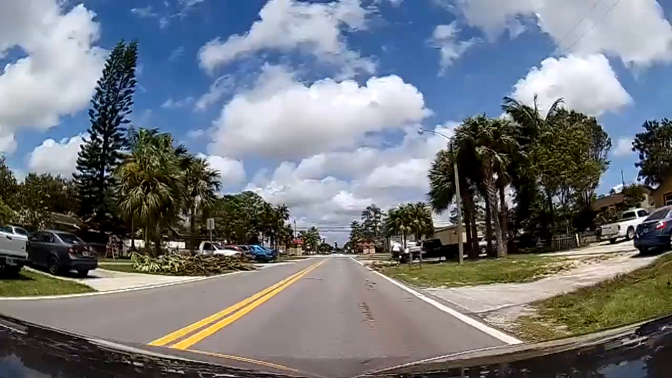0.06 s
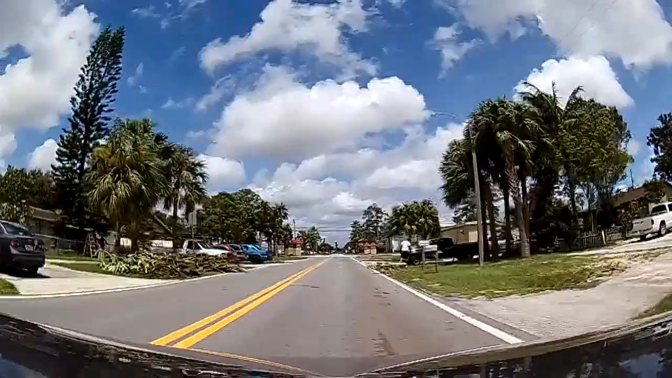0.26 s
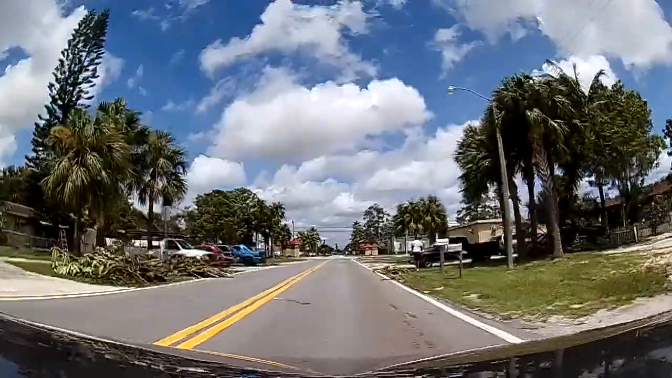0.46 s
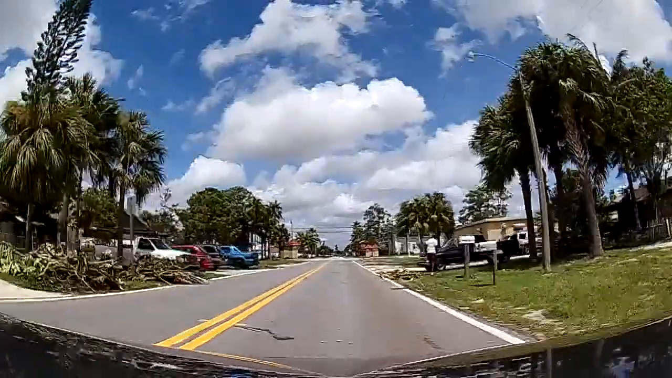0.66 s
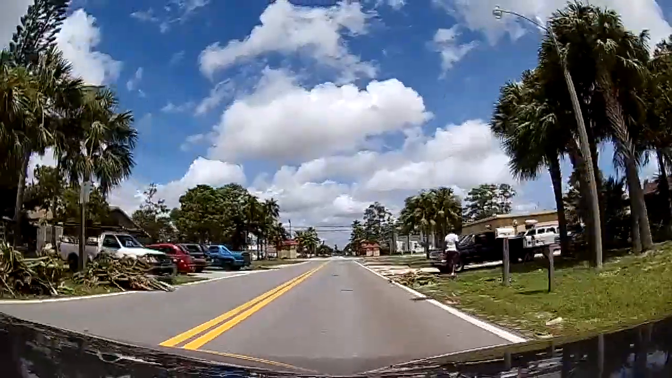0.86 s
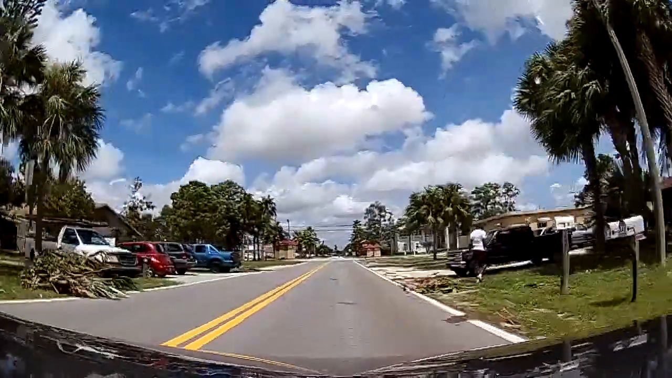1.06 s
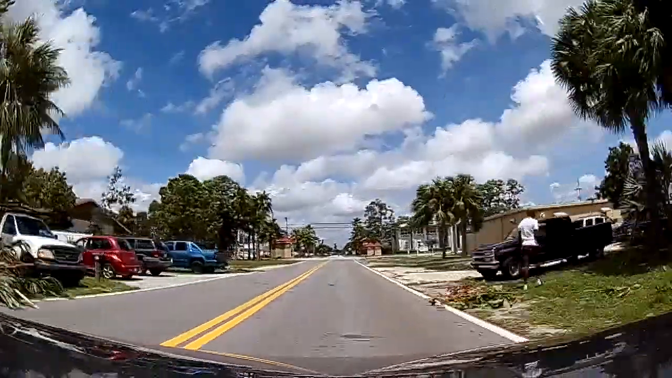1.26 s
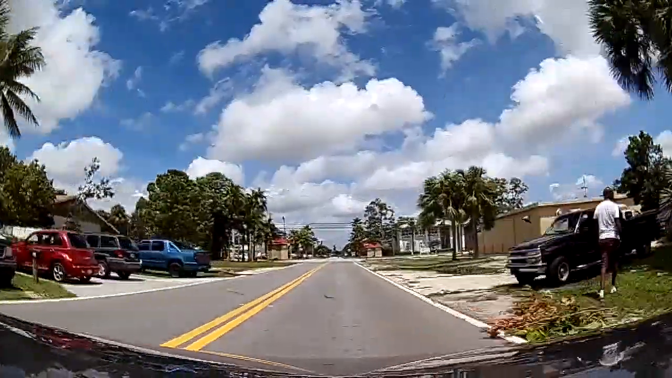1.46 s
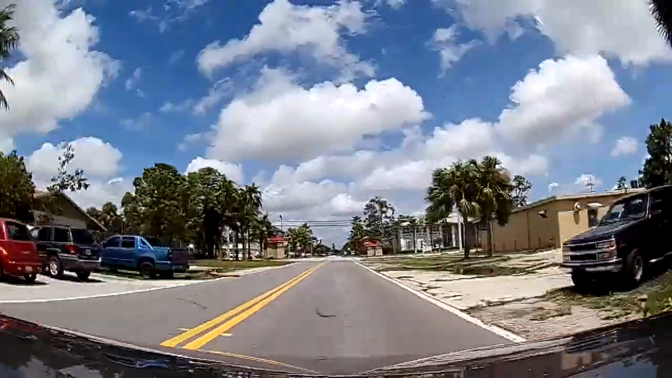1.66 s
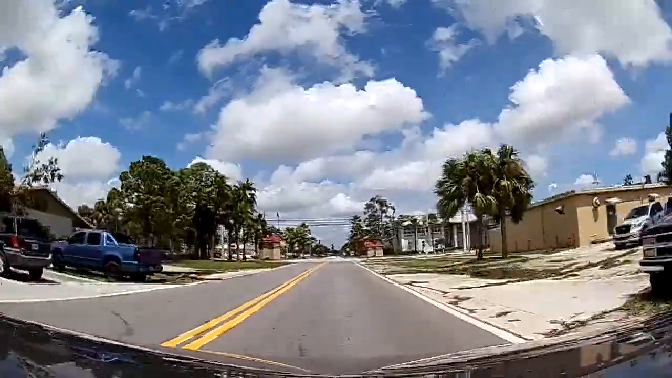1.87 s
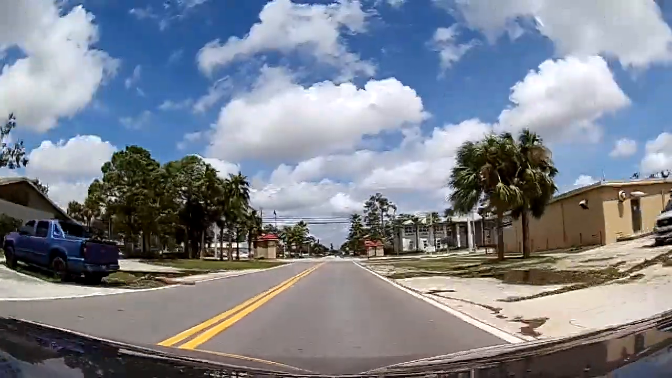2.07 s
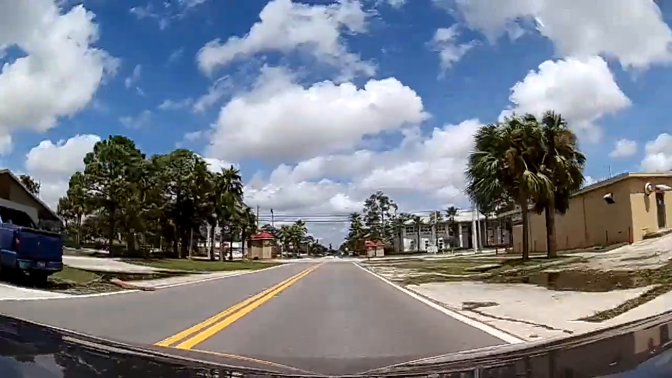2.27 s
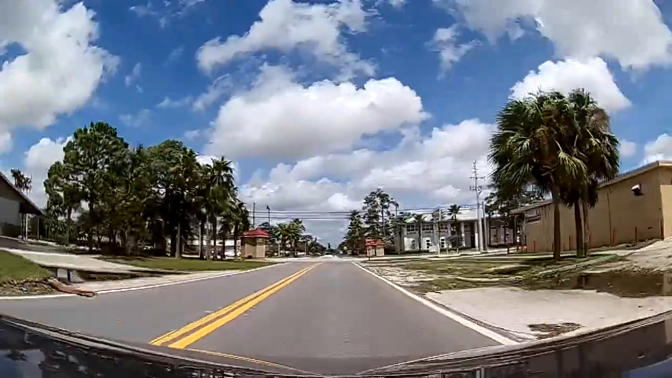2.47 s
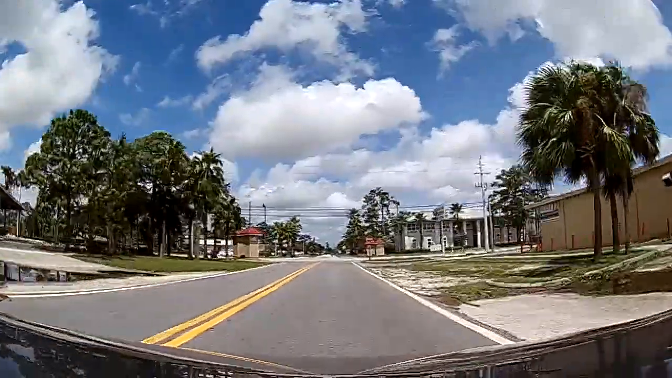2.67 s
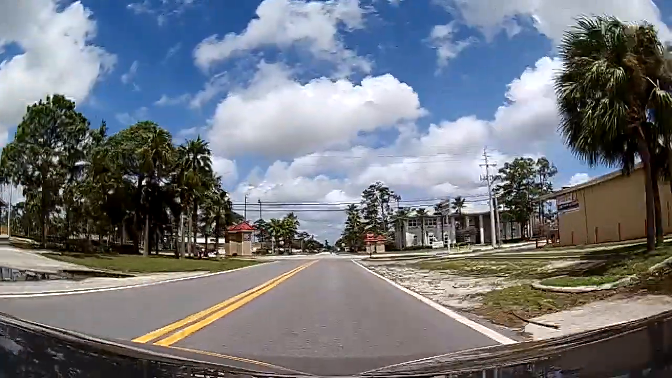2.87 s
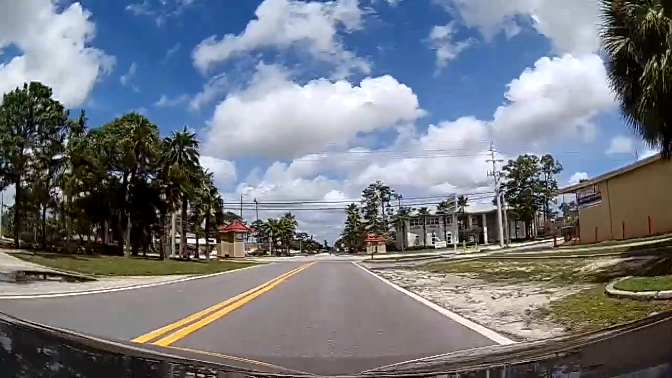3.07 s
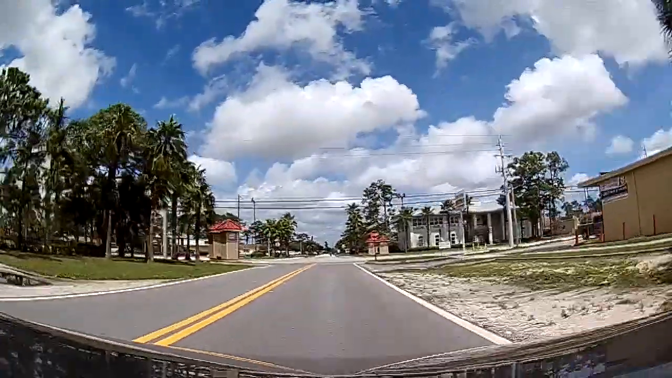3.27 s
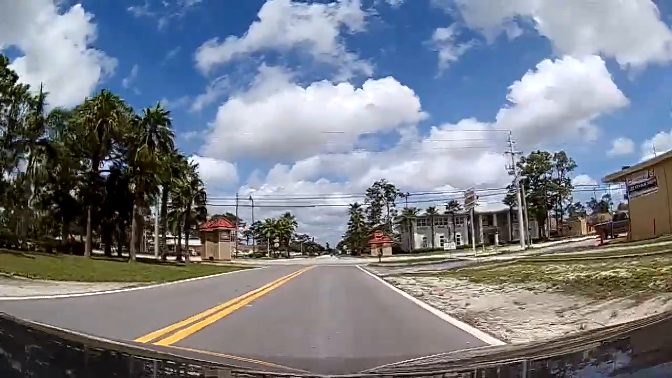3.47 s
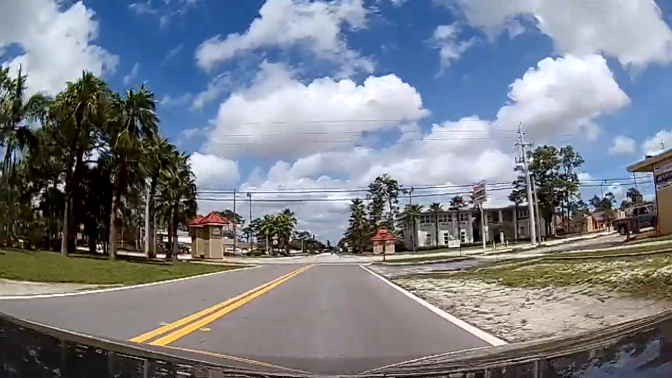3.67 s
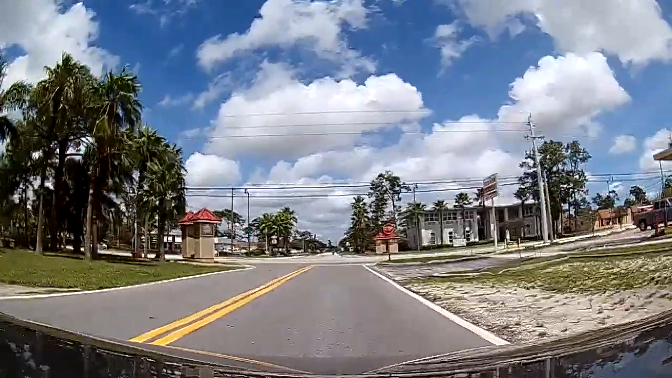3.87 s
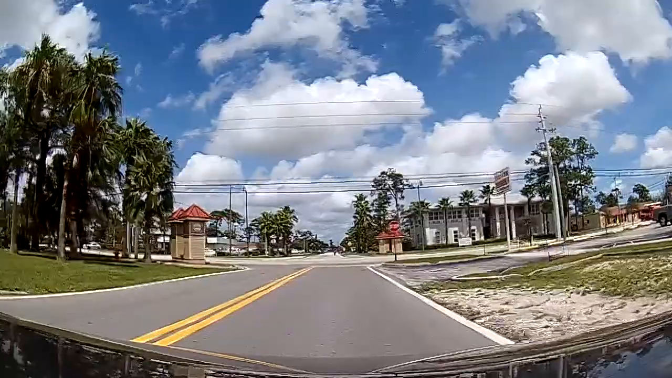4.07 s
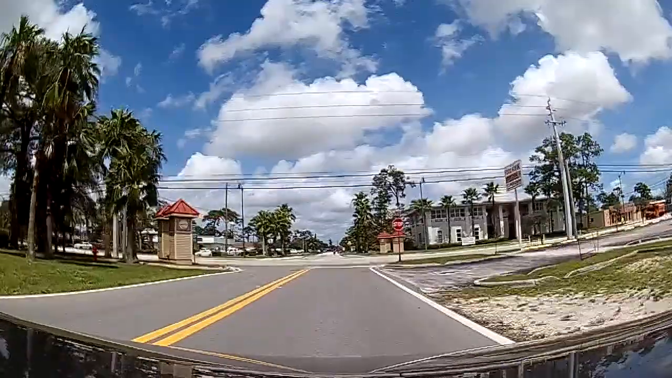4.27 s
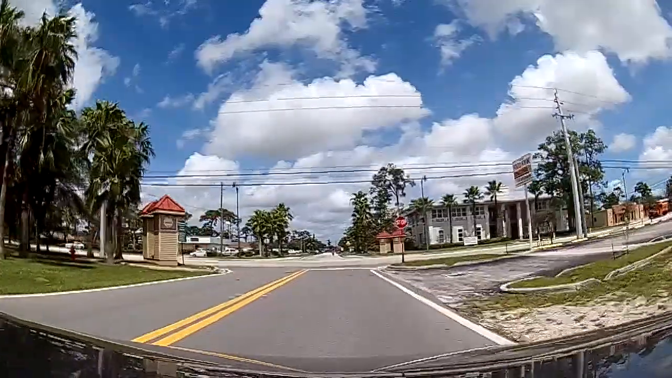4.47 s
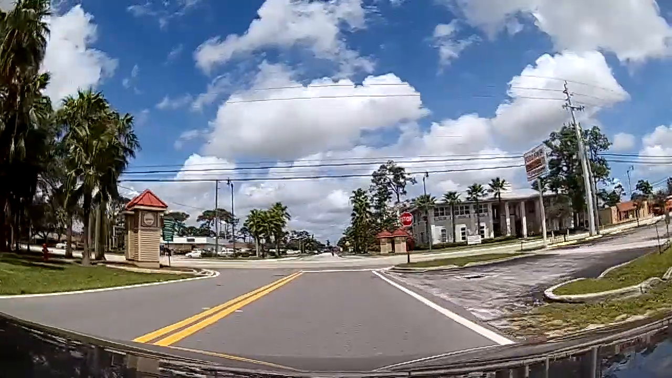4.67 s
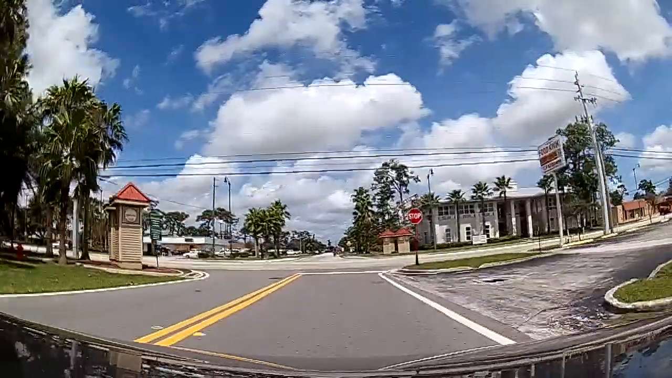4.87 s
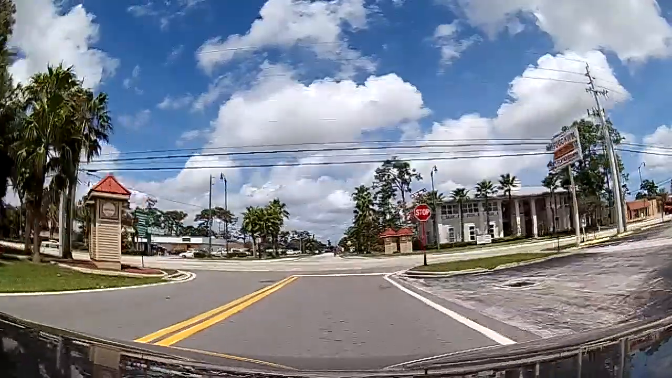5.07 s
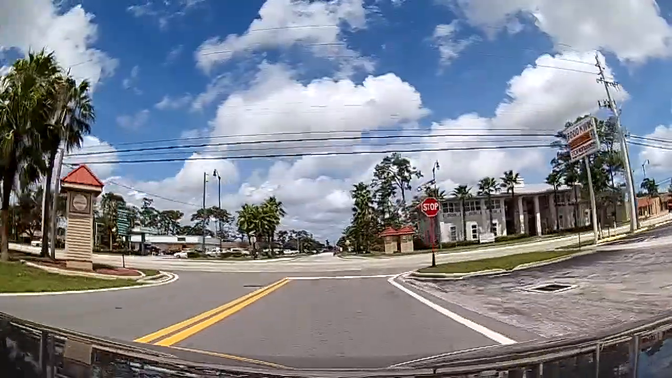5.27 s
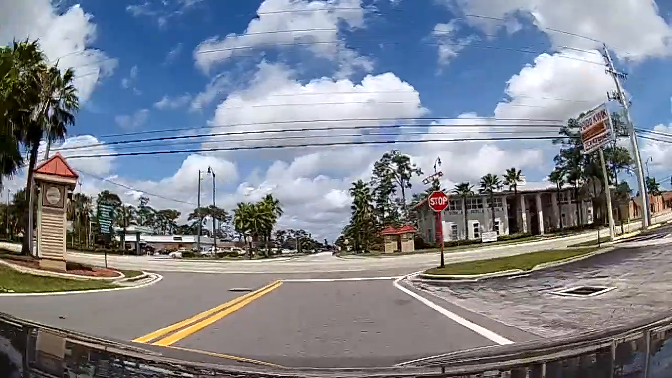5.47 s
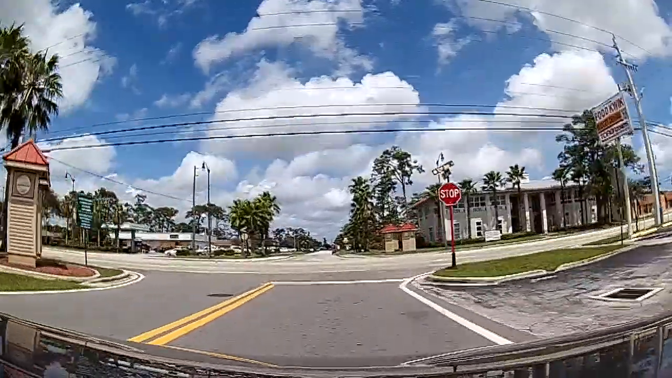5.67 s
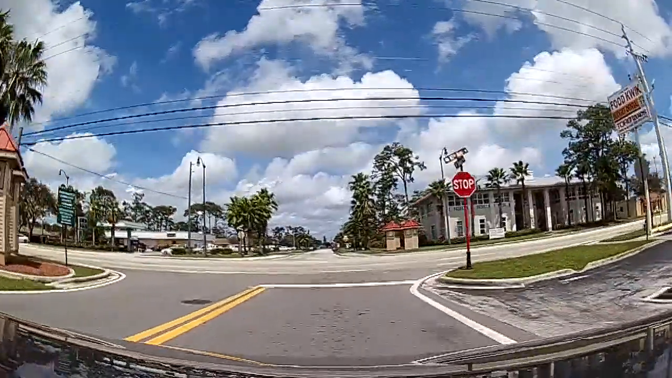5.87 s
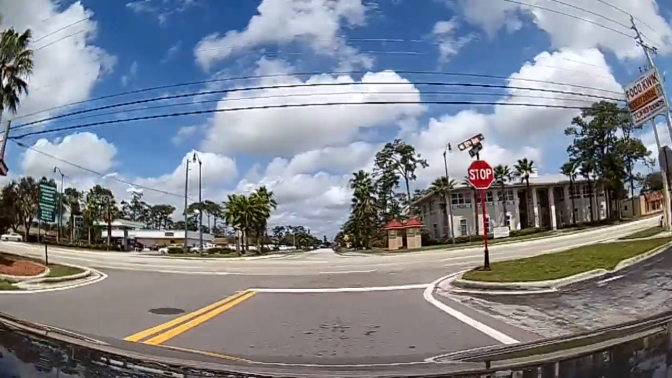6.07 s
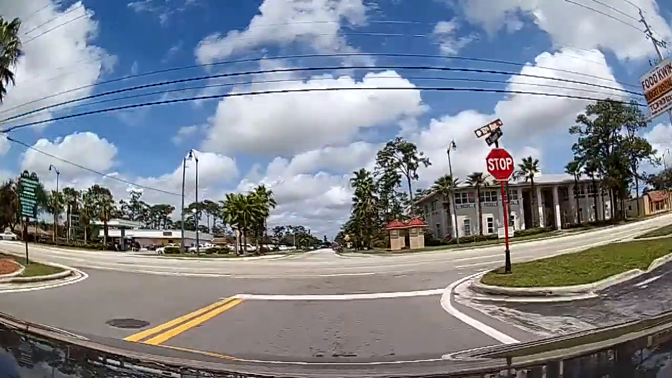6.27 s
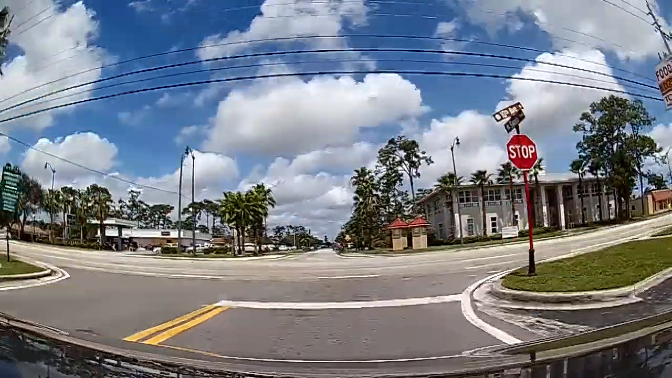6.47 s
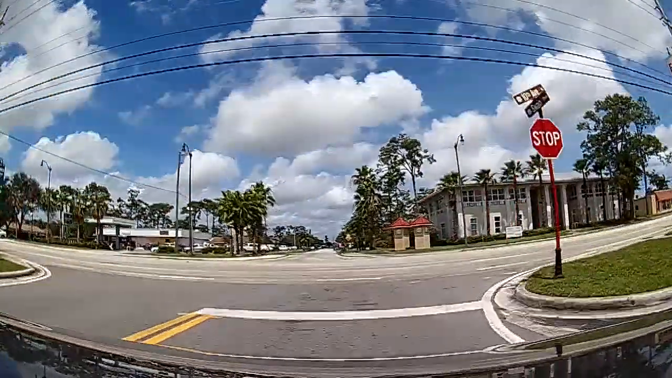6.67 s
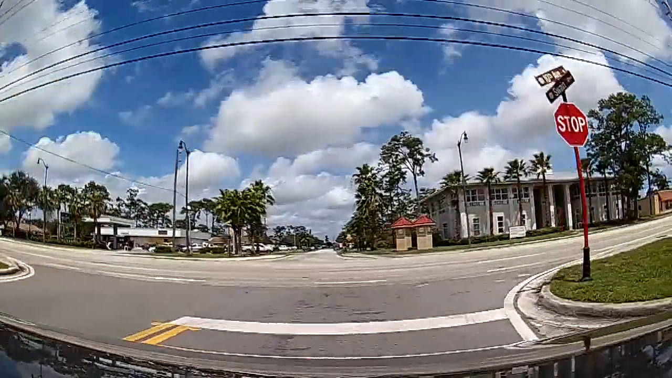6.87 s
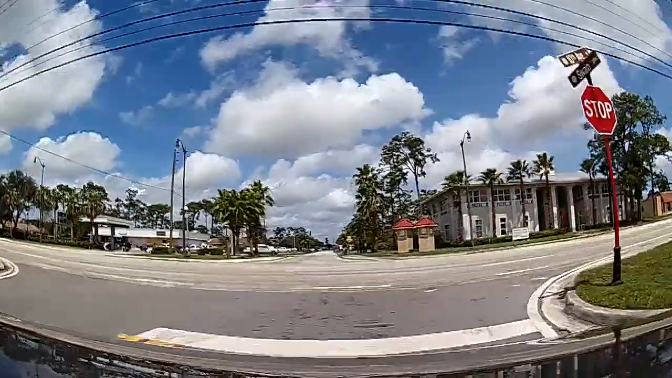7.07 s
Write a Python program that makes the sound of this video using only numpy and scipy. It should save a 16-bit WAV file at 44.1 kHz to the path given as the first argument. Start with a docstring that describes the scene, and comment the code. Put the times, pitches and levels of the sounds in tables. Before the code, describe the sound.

A deep, booming drone fills the cabin of a moving car from the start, heard from near the windscreen. For the first three seconds the car cruises, its body booming on repeated bumps while the road thrums and the tyres roar with a low, throbbing hum. At about 3 seconds loose plastic trim gives one short, high chirp, and a light dashboard knock follows just after. Fainter ticks come at around 3.9 and 4.1 seconds, and another small knock at 4.9. From about 3 seconds on the car slows steadily: the booming weakens, the tyre roar dulls to a softer roll, and a faint gear whine slides down. A soft drone swells at around 5.5 seconds during braking. By 7 seconds the muffled engine has dropped towards idle, with the car still rolling and rumbling. A faint, thin hiss runs underneath throughout.

```python
"""A deep, booming drone comes first: we are inside a car that cruises, coasts, then brakes.
The body shakes at its lowest note and booms on each bump. The road thrums through the suspension,
the air inside the tyres hums, and the tread's roar rings in the panels and cabin.
As the car slows, the engine drops towards idle and the gears whine downwards.
The dashboard knocks and loose plastic trim chirps a few times over a steady thin hiss."""
import sys
import numpy as np
from scipy import signal
from scipy.fft import rfft, irfft
from scipy.io import wavfile
from scipy.ndimage import uniform_filter1d

SR = 44100
rng = np.random.default_rng(int(sys.argv[2]) if len(sys.argv) > 2 else 0)


def unload_wav(signal):
    """Save mono or channel-first audio to the path in sys.argv[1] as 16-bit WAV at rate SR, clipped to [-1, 1]."""
    wavfile.write(
        sys.argv[1],
        SR,
        np.round(np.clip(np.atleast_2d(signal).T, -1, 1) * 32767).astype(np.int16),
    )


N = 314423
T = np.arange(N) / SR


# The body's trembling between bumps. Each row: time in seconds, pitch in Hz, level in dB.
BODY_TREMBLE = [(0, 38.2, -41.5), (0.08, 38.6, -15), (0.9, 37.5, -10.5), (1.75, 38.3, -10.5),
                (1.86, 38.9, -22.5), (2.25, 42.25, -20.5), (2.5, 38.36, -14), (2.8, 37.7, -18.5),
                (3.2, 40.6, -19), (3.6, 40.02, -17.5), (4.05, 42.87, -20.5), (4.7, 39.3, -26.5),
                (5.4, 42.5, -29), (7.13, 41.85, -24)]
# Uneven stretches of road. Each row: start in seconds, length in seconds, level in dB.
BUMPS = [(0.008, 0.076, 1), (0.274, 0.22, -9), (0.599, 0.097, -2), (0.72, 0.31, -11.5), (1.15, 0.11, -8),
         (1.335, 0.14, -13.5), (1.534, 0.11, -7), (1.672, 0.11, -8), (1.883, 0.11, -7),
         (2.049, 0.21, -16.5), (2.39, 0.17, -6), (2.547, 0.25, -9.5), (2.94, 0.13, -7.5), (3.158, 0.12, -7),
         (3.31, 0.095, -6), (3.779, 0.056, -14), (3.877, 0.1, -9.5), (4.094, 0.15, -14.5),
         (4.371, 0.36, -18), (5.063, 0.075, -19.5), (5.501, 0.16, -19.5), (5.997, 0.043, -16),
         (6.193, 0.047, -14), (6.69, 0.17, -14)]

def body_boom(offset_db=-0.25, shudder_db=0.86, tremble_db=1.5, wander_hz=0.348, ceiling=0.58):
    """The car's body drones at its lowest note and swells on each bump, up to a ceiling."""
    hz, level_db = follow(BODY_TREMBLE)
    tremble = gain_of(level_db + tremble_db * drift(9.7))
    bump_power = sum((gain_of(db) * swell(start, length, rise_s=0.052, decay_s=0.061)) ** 2
                     for start, length, db in BUMPS)
    shake = np.sqrt(bump_power + tremble ** 2) * gain_of(offset_db + shudder_db * drift(29))
    hz = hz + wander_hz * drift(12) / np.maximum(shake, 0.08)  # a weak boom wanders more in pitch
    smooth_shake = uniform_filter1d(np.minimum(shake, ceiling), size=1000)
    return smooth_shake * fuzzy_tone(hz, width_hz=18, rough=0.004)


# Rough patches of road. Each row: start in seconds, length in seconds, boost in dB.
THUMPS = [(0.03, 0.17, 4), (2.75, 0.22, 2.5), (3.012, 0.25, 5), (3.824, 0.1, 1.5), (4.271, 0.079, 3),
          (4.49, 0.039, 0.5), (5.344, 0.097, 5), (6.188, .1, 3), (6.551, 0.22, 0.5)]
# The suspension's thrum and the floor's rumble. Each row: frequency in Hz, relative level in dB.
THRUM_SHAPE = [(60, -24), (85, -2.5), (100, -1.5), (125, -1), (145, 2.5), (165, 2.5), (190, -1.5),
               (213, -6), (232, -4), (272, -4), (320, -19), (600, -60)]
RUMBLE_SHAPE = [(12, -5), (23, 9), (32, 4.5), (40, -0.5), (53, 16), (61, 10.5), (72, 3), (90, -3),
                (130, -28), (300, -61)]

def road_thrum(patchy_db=1.28, rumble_share=0.67, air_base_hz=144.7, air_rise_hz=32.93):
    """The rough road shakes the suspension and floor, and rings the air inside the tyres."""
    thump_db = sum(db * swell(start, length, rise_s=0.02, decay_s=0.044) for start, length, db in THUMPS)
    thrum = with_speed(cruise_db=-33, power=0.8) * noise(lambda hz: read(THRUM_SHAPE, hz))
    rumble = with_speed(cruise_db=-25.5, power=1.72) * noise(lambda hz: read(RUMBLE_SHAPE, hz))
    air_hz = air_base_hz + air_rise_hz * speed()
    ring = with_speed(cruise_db=-43, power=2.6) * fuzzy_tone(air_hz, width_hz=7.8, rough=0.75)
    thrum *= gain_of(patchy_db * drift(20))
    return gain_of(thump_db) * (thrum + ring) + gain_of(rumble_share * thump_db) * rumble


# The note of the air in the tyres. Each row: time in seconds, pitch in Hz, level in dB.
TYRE_HUM = [(0, 180.8, -40), (0.25, 180.5, -37), (0.55, 179.2, -40.5), (0.8, 179.5, -34), (1.35, 178, -38),
            (2.1, 175.7, -34), (2.5, 174.2, -44.5), (3.1, 173.6, -36), (3.5, 172.6, -43.5),
            (4.4, 172.3, -43.5), (5.2, 170.4, -58)]

def tyre_hum(throb_db=2.8, uneven_db=1.8, cruise_turns_per_s=7.1):
    """The air inside the tyres hums an almost pure note that throbs unevenly as the wheels turn."""
    hz, level_db = follow(TYRE_HUM)
    turn = np.sin(2 * np.pi * np.cumsum(cruise_turns_per_s * speed()) / SR)
    level = gain_of(level_db + throb_db * turn + uneven_db * drift(11))
    return level * fuzzy_tone(hz, width_hz=6.3, rough=0.097)


# Tread noise: fast roar, slow roll and sizzle. Each row: frequency in Hz, relative level in dB.
FAST_SHAPE = [(150, -46), (300, -12), (420, -11.5), (700, -14.5), (950, -14.5), (1150, -7), (1450, -4.5),
              (2000, -17), (2500, -25.5), (3300, -30), (3900, -41.5), (4300, -42.5), (6000, -53),
              (12000, -74.5)]
SLOW_SHAPE = [(150, -28.5), (300, -3.5), (420, -5), (600, -12), (720, -9.5), (950, -9.5), (1150, -8),
              (1450, -7.5), (2000, -14.5), (2500, -21), (3300, -23), (3900, -34), (4300, -55), (12000, -68)]
SIZZLE_SHAPE = [(1200, -32), (2100, -4), (3300, -5.5), (3900, -13.5), (4400, -15.5), (6000, -21.5),
                (12000, -48)]
# How loud the tread sizzles on coarse asphalt. Each row: time in seconds, level in dB.
SIZZLE_LEVEL = [(0, -50.5), (0.9, -53.5), (2.2, -53.5), (2.9, -52.5), (3.3, -54.5), (3.7, -73)]
# Where tread, panels and cabin ring. Each row: frequency in Hz, width in Hz, boost (or cut) in dB.
PANEL_RINGS = [(504.4, 32, 6), (559, 52, 5), (615, 32, 8.5), (787, 120, 3), (1192, 74, 9), (1261, 64, 8),
               (1356, 52, 8), (1445, 19, 3), (1513, 46, 1), (1607, 52, -4), (1740, 112, 9), (1843, 54, 4),
               (2180, 51, 5.5), (2410, 36, 6.5), (2740, 110, 7), (2900, 120, -2.5), (3090, 130, 7.5),
               (3400, 66, 6.5), (3844, 130, 7)]

def tyre_roar(flutter_db=0.64):
    """Tread noise rings in the panels. As the car slows, the bright roar fades and a duller roll stays."""
    def in_panels(shape):
        return noise(lambda hz: read(shape, hz) + lift_db(PANEL_RINGS, hz))

    fast = with_speed(cruise_db=-31, power=2.66) * in_panels(FAST_SHAPE)
    slow = with_speed(cruise_db=-41.5, power=0.22) * in_panels(SLOW_SHAPE)
    sizzle = gain_of(follow(SIZZLE_LEVEL)[0]) * in_panels(SIZZLE_SHAPE)
    return gain_of(flutter_db * drift(18)) * (fast + slow + sizzle)


# The tread's thin whistles. Each row: pitch at cruising speed in Hz, relative level in dB.
TREAD_TONES = [(1041, -14), (1088, -8), (1267, -0.5)]

def tread_whistle():
    """Tread blocks slap the road and sing; the notes sink and fade as the car slows."""
    tones = sum(gain_of(db) * fuzzy_tone(hz * speed(), width_hz=4.5, rough=0.51)
                for hz, db in TREAD_TONES)
    return with_speed(cruise_db=-41.5, power=8.6) * tones


# The engine's hum. Each row: time in seconds, pitch in Hz, level in dB, overtone level in dB.
ENGINE_HUM = [(0, 122.8, -59, -44.5), (0.6, 121, -57.5, -44.5), (2.05, 118.5, -55, -47.5),
              (2.25, 119.5, -61, -52.5), (3.4, 119.8, -62, -47.5), (4.5, 118.3, -48, -71),
              (5.8, 108.6, -51, -81), (6.7, 78.3, -37.5, -77), (7.13, 71.7, -40, -67)]
# Its overtones (higher notes). Each row: multiple of the pitch, relative level in dB.
ENGINE_OVERTONES = [(3, -7.5), (4, -3)]

def engine():
    """The muffled engine loses its overtones off the throttle and drops towards idle."""
    hz, level_db, overtone_db = follow(ENGINE_HUM)
    overtones = sum(gain_of(db) * fuzzy_tone(multiple * hz, width_hz=7.7, rough=0.24)
                    for multiple, db in ENGINE_OVERTONES)
    hum = fuzzy_tone(hz, width_hz=9.2, rough=0.29)
    return gain_of(level_db) * hum + gain_of(overtone_db) * overtones


# The whine's notes. Each row: multiple of the rate at which gear teeth meet, relative level in dB.
WHINE_NOTES = [(2, 6), (3, 2)]
# Where the gear housing rings. Each row: tooth rate in Hz, width in Hz, boost in dB.
HOUSING_RINGS = [(453, 13, 12.5), (371, 28, 11)]
# A drone that swells during braking. Each row: time in seconds, pitch in Hz, level in dB.
BRAKING_DRONE = [(3.4, 358.8, -57), (4.8, 283.8, -50), (5.4, 262.2, -43), (5.9, 262.4, -43.5),
                 (6.4, 253, -62)]

def drivetrain(cruise_tooth_hz=527):
    """The gears' whine sinks with the speed and swells where their housing rings, over a low drone."""
    tooth_hz = cruise_tooth_hz * speed()
    level = with_speed(cruise_db=-65.5, power=1) * gain_of(lift_db(HOUSING_RINGS, tooth_hz))
    whine = sum(gain_of(db) * fuzzy_tone(multiple * tooth_hz, width_hz=7.3, rough=0.7)
                for multiple, db in WHINE_NOTES)
    drone_hz, drone_db = follow(BRAKING_DRONE)
    return level * whine + gain_of(drone_db) * fuzzy_tone(drone_hz, width_hz=21, rough=0.65)


# Slips of the trim. Each row: start in seconds, level in dB, pitch in Hz, width in Hz,
# fade time in seconds. A narrow one is a clear chirp, a wide one a dry tick.
TRIM_SLIPS = [(1.622, -35, 2800, 2800, 0.0036), (3.009, -18, 3370, 260, 0.0061),
              (3.025, -36, 3450, 450.3, 0.012), (3.208, -44, 3100, 800, 0.016),
              (3.879, -37.5, 3230, 599, 0.0066), (4.119, -37.5, 3300, 600, 0.0092),
              (4.891, -44, 3220, 700, 0.0044)]

def trim_chirps(sharp_share=0.05, settle_s=0.006, overtone_ratio=1.39, overtone_db=-25):
    """Loose plastic slips and rings briefly on two notes, which start a little high and settle."""
    out = np.zeros(N)
    for start, db, pitch_hz, width_hz, decay_s in TRIM_SLIPS:
        hz = pitch_hz * (1 + sharp_share * np.exp(-np.clip((T - start) / settle_s, 0, 20)))
        low, high = (fuzzy_tone(ratio * hz, width_hz / 2, rough=width_hz / 400)
                     for ratio in (1, overtone_ratio))
        ring = low + gain_of(overtone_db) * high
        out += gain_of(db) * ring * struck(start, rise_s=0.0047, decay_s=decay_s)
    return out


# Dashboard knocks. Each row: start in seconds, ring level in dB, crack level in dB.
KNOCKS = [(3.174, -22, -45), (3.881, -37, -36), (4.120, -43, -34), (4.889, -37, -33), (4.898, -26, -44)]
# The notes of a knock. Each row: pitch in Hz, relative level in dB, fade time in seconds.
DASH_NOTES = [(1280, 5, 0.0038), (1460, -6, .004), (1750, -11, 0.0045)]
# The crack of contact. Each row: frequency in Hz, relative level in dB.
CRACK_SHAPE = [(500, -15), (1800, 10), (2700, 1), (3600, -4), (4300, -22), (9000, -45)]

def dashboard_knocks(rise_s=0.0011, crack_decay_s=0.0069):
    """The dashboard knocks: each contact makes a dry crack and a short hollow ring."""
    crack = noise(lambda hz: read(CRACK_SHAPE, hz))
    out = np.zeros(N)
    for start, ring_db, crack_db in KNOCKS:
        ring = sum(gain_of(db) * np.sin(2 * np.pi * hz * (T - start)) * struck(start, rise_s, decay_s)
                   for hz, db, decay_s in DASH_NOTES)
        out += gain_of(ring_db) * ring + gain_of(crack_db) * crack * struck(start, rise_s, crack_decay_s)
    return out


def squeak(start_s=4.3, length_s=0.044, hz=6000, level_db=-68):
    """One tiny high squeak in the cabin, with a second note an octave above."""
    tone = sum(fuzzy_tone(np.full(N, multiple * hz), width_hz=90, rough=0.68) for multiple in (1, 2))
    return gain_of(level_db) * tone * swell(start_s, length_s, rise_s=0.012, decay_s=0.008)


# The steady hiss. Each row: frequency in Hz, relative level in dB.
HISS_SHAPE = [(100, -6.5), (2000, 12.5), (4200, 4.5), (5000, 3.5), (6000, 2.5), (7000, 0.5), (9000, -0.5),
              (11400, -2.5), (12100, 0), (12800, -4), (15700, -4.5)]
# Faint electrical tones. Each row: pitch in Hz, level in dB.
ELECTRIC_TONES = [(15204, -79), (15298, -87)]

def hiss(level_db=-54):
    """Electronics add an even hiss and two thin, very high tones."""
    tones = sum(gain_of(db) * fuzzy_tone(np.full(N, hz), width_hz=5, rough=0.4)
                for hz, db in ELECTRIC_TONES)
    return gain_of(level_db) * noise(lambda hz: read(HISS_SHAPE, hz)) + tones


# How the car slows. Each row: time in seconds, share of cruising speed.
ROAD_SPEED = [(0, 1), (2.9, 0.99), (3.4, 0.91), (3.79, 0.858), (4.2, 0.79), (4.58, .718), (4.8, 0.703),
              (5.05, .67), (5.5, 0.57), (7.13, 0.38)]

def speed():
    """The car's speed at each moment, where 1 is cruising."""
    return np.maximum(follow(ROAD_SPEED)[0], 0.05)


def with_speed(cruise_db, power):
    """A gain of cruise_db when cruising; the higher the power, the more it falls as the car slows."""
    return gain_of(cruise_db) * speed() ** power


def gain_of(db):
    """Turns decibels into a number to multiply by."""
    return 10 ** (np.asarray(db) / 20)


def read(shape, hz):
    """A shape table's level in dB at hz, blending between rows on a log-frequency scale."""
    row_hz, row_db = np.transpose(shape)
    return np.interp(np.log(hz + 1), np.log(row_hz + 1), row_db)


def follow(rows):
    """Joins a table's rows over time, giving one curve for each column after the first."""
    times, *columns = np.transpose(rows)
    return [np.interp(T, times, column) for column in columns]


def lift_db(rings, hz):
    """How many dB a set of resonances (places that ring) adds at hz."""
    return sum(db / (1 + (2 * (hz - centre) / width) ** 2) for centre, width, db in rings)


def noise(shape_db):
    """Steady noise of average strength (rms) 1, coloured by the function shape_db(hz)."""
    hz = np.fft.rfftfreq(N, 1 / SR)
    shaped = irfft(rfft(rng.standard_normal(N)) * gain_of(shape_db(hz)), N)
    return shaped / np.sqrt(np.mean(shaped ** 2) + 1e-20)


def drift(rate_hz):
    """A random wander of strength 1, with up to about rate_hz wiggles a second."""
    return noise(lambda hz: -20 * np.log10(1 + (hz / rate_hz) ** 4))


def fuzzy_tone(hz, width_hz, rough):
    """A tone that follows the pitch curve hz: pure when rough is 0, a band of noise when it is 1."""
    rough = np.clip(rough, 0, 1)
    steady = np.sqrt(2 * (1 - rough))
    wander = np.sqrt(rough) * (drift(width_hz) + 1j * drift(width_hz))
    cycles = np.cumsum(hz) / SR + rng.random()
    return ((steady + wander) * np.exp(2j * np.pi * cycles)).real


def swell(start, length, rise_s, decay_s):
    """A level that rises, holds until the length is over, and dies away."""
    age = T - start
    return np.clip(age / rise_s, 0, 1) * np.exp(-np.clip((age - length) / decay_s, 0, 20))


def struck(start, rise_s, decay_s):
    """A level that jumps up at the start and dies away at once."""
    age = np.maximum(T - start, 0)
    return (1 - np.exp(-np.minimum(age / rise_s, 20))) * np.exp(-np.minimum(age / decay_s, 20))


def scene():
    """Everything as heard at the windscreen, in one channel."""
    road = body_boom() + road_thrum() + tyre_hum() + tyre_roar() + tread_whistle()
    return (road + engine() + drivetrain() + trim_chirps() + squeak() + dashboard_knocks() + hiss())[None]


def record(dry, cutoff_hz=15720):
    """Flattens any peak beyond full scale, then removes the highest treble."""
    low_pass = signal.firwin(1023, cutoff_hz, window=("kaiser", 9), fs=SR)
    return signal.oaconvolve(np.clip(dry, -1, 1), low_pass[None], "same")


dry = scene()
out = record(dry)
unload_wav(out)
```